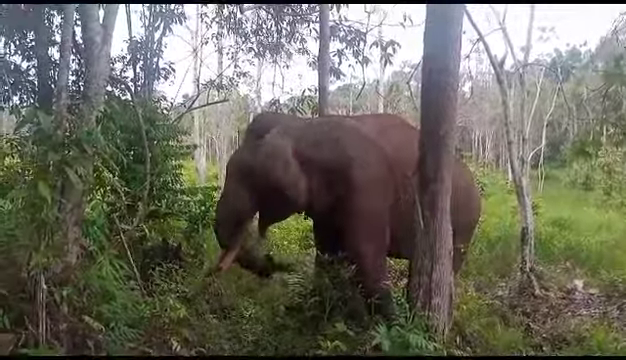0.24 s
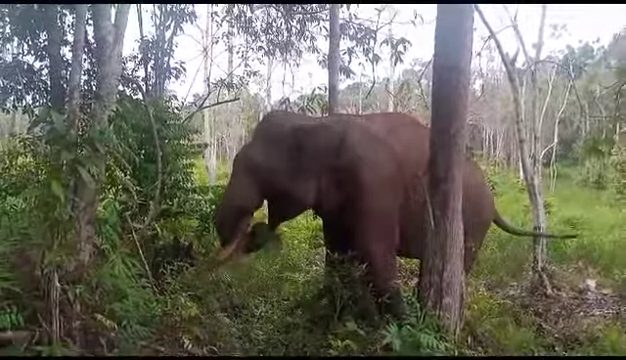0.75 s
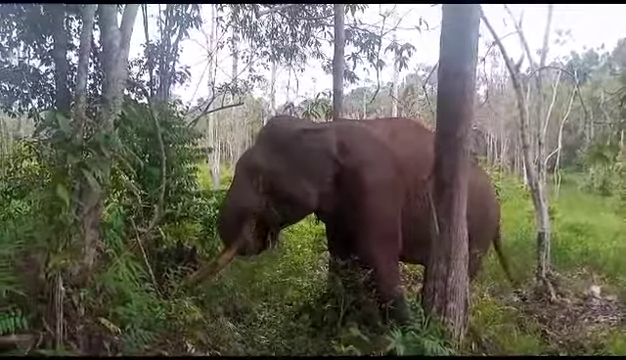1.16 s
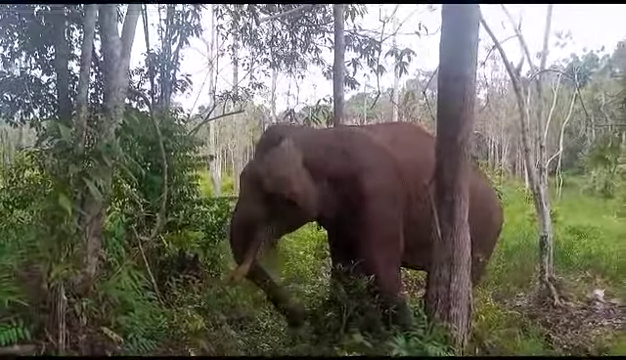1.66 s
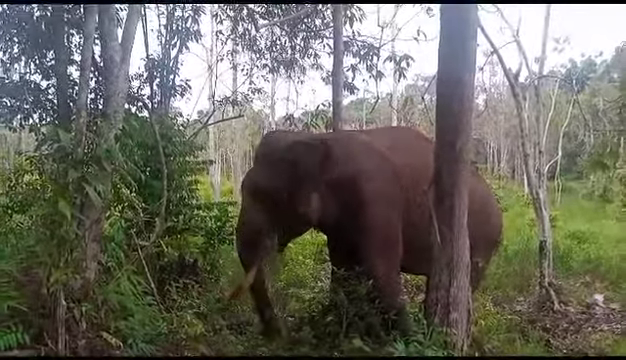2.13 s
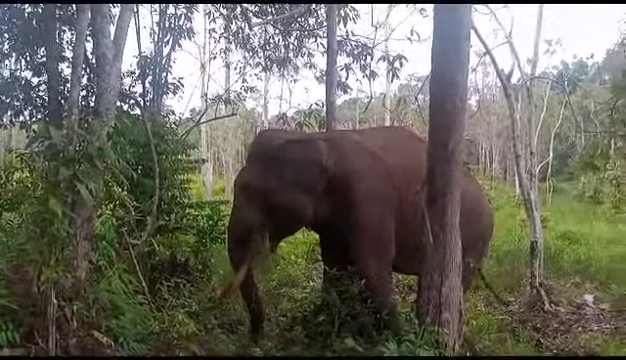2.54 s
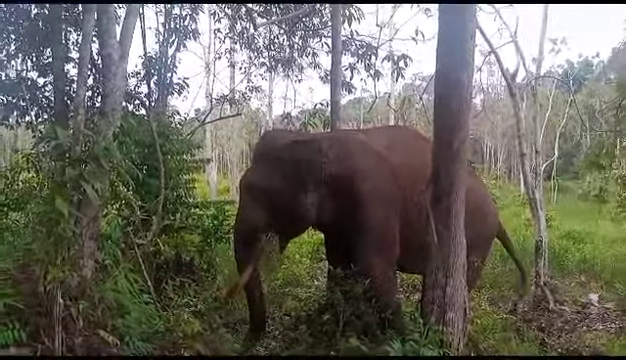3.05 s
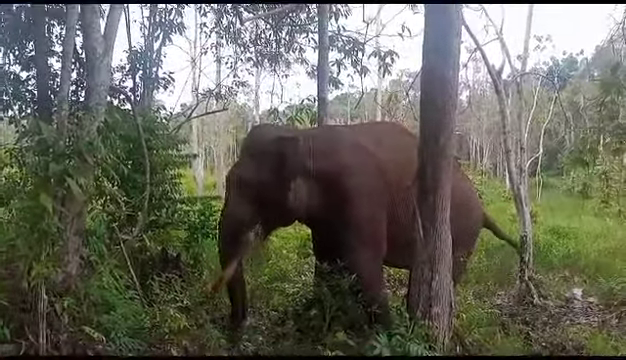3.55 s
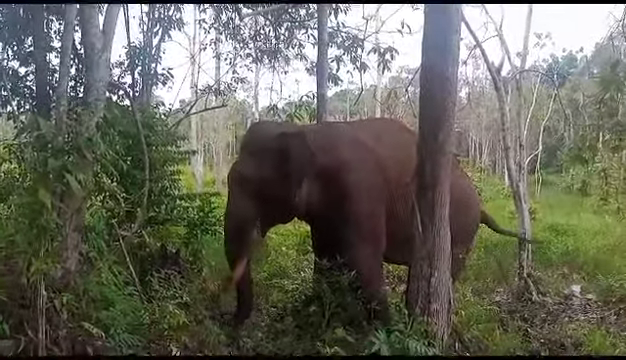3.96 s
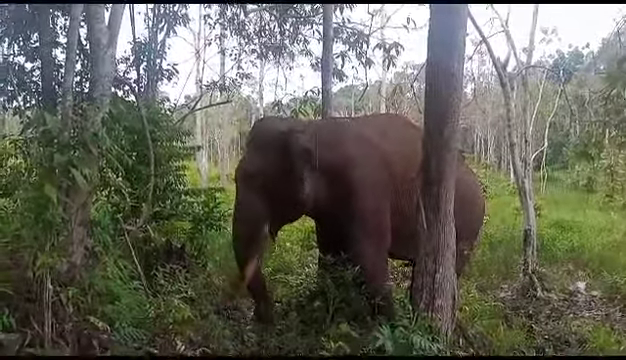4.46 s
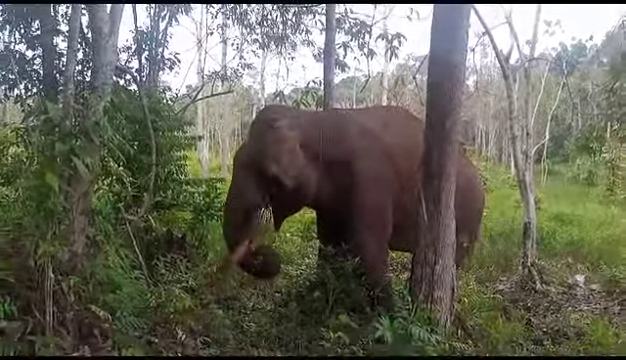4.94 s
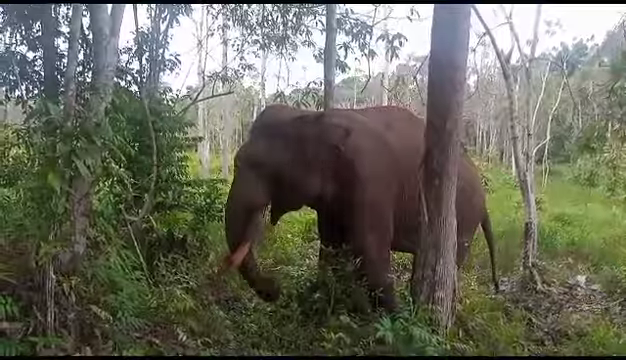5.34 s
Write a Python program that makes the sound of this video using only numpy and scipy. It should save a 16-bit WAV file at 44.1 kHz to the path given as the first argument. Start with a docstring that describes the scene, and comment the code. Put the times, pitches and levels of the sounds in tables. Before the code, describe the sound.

An elephant tears up grass and undergrowth with crackling rustles, sharp snaps and dull thumps, over a steady sizzle of forest insects.

```python
"""An elephant wraps its trunk round grass and undergrowth and tears it up at the edge of a forest.
Each tug sets leaves, stalks and roots crackling with tiny fractures; stems snap fibre by fibre,
sticks clack and the ground thumps dully. Insects buzz and shrill, a small bird whistles,
and the trees scatter a short echo."""
import sys
import numpy as np
from scipy import signal
from scipy.fft import rfft, irfft, next_fast_len
from scipy.io import wavfile
from scipy.ndimage import uniform_filter1d

SR = 44100
rng = np.random.default_rng(int(sys.argv[2]) if len(sys.argv) > 2 else 0)


def wrap_up_sound(samples):
    """Save the sound to the file named by the first command line argument, as 16-bit audio."""
    columns = np.atleast_2d(samples).T
    # keep every value between -1 and 1, then stretch to whole-number steps
    tamed = np.clip(columns, -1, 1)
    steps = np.round(tamed * 32767).astype(np.int16)
    wavfile.write(sys.argv[1], SR, steps)


N = 247004
T = np.arange(N) / SR

# tugs at the plants: (time [s], hold [s], leaves [dB], stalks [dB], roots [dB])
TRUNK_TUGS = [(0.0, 0.067, -55.5, -68, -67.5), (.098, .03, -44, -55.5, -56.5),
              (.25, 0.061, -58.5, -67, -74.5), (0.409, .04, -58, -72.5, -84), (.57, .09, -59.5, -73, -83.5),
              (.725, 0.096, -54.5, -65.5, -67.5), (.92, 0.011, -55, -66.5, -80),
              (1.016, 0.05, -53, -67.5, -67.5), (1.26, 0.042, -59, -75.5, -89),
              (1.346, 0.032, -52.5, -66.5, -74.5), (1.53, 0.017, -67.5, -82.5, -91),
              (1.895, .035, -61, -83, -87), (2.01, 0.065, -59.5, -76, -82.5), (2.21, 0.047, -63, -76, -89),
              (2.41, 0.035, -64.5, -74, -82), (2.573, 0.049, -60, -72, -83),
              (3.075, 0.12, -55.5, -69, -76.5), (3.23, 0.083, -59.5, -73.5, -76),
              (3.41, 0.045, -59, -76.5, -87), (3.488, 0.095, -62, -73, -82.5),
              (3.735, 0.044, -58.5, -70.5, -77), (3.9, 0.11, -59.5, -68, -70.5),
              (4.12, 0.18, -62, -70.5, -75.5), (4.387, .06, -48, -61.5, -68), (4.5, 0.079, -55, -66, -68),
              (4.595, 0.018, -49.5, -58.5, -66.5), (4.81, 0.063, -63.5, -68.5, -73),
              (4.99, 0.034, -64, -72, -74), (5.113, 0.06, -50, -62.5, -68),
              (5.26, 0.071, -63.5, -76.5, -79), (5.425, 0.03, -59, -74, -83),
              (5.5, 0.11, -63.5, -75, -73.5)]


def tearing():
    """Leaves, stalks and roots crackle; the harder the tug, the denser the fractures."""
    # spectra: (frequency [Hz], level [dB])
    leaf_spectrum = [(1700, -34), (2550, -9), (3300, -1.5), (4000, -2), (5200, -2), (6600, 0.5), (8000, -9),
                     (9600, -3), (11500, -7.5), (13500, -15.5), (16000, -9.5)]
    stalk_spectrum = [(700, -19), (1100, -8), (1450, 2), (1800, -2.5), (2100, 2), (2450, -15),
                      (3500, -27.5)]
    root_spectrum = [(25, -30), (70, -13), (130, -2.5), (260, -3), (440, 4.5), (600, -2), (850, 1.5),
                     (1200, -16), (2000, -18)]
    # light stirring between tugs: (time [s], leaves [dB], stalks [dB])
    stirring = [(0, -64.5, -74.5), (.95, -59.5, -74.5), (1.2, -65, -81.5), (1.6, -78, -81),
                (1.83, -73, -86), (2.15, -64, -82.5), (2.55, -66.5, -87.5), (2.83, -79, -85),
                (2.99, -60.5, -81.5), (3.35, -65, -79), (3.68, -66.5, -82), (3.901, -65, -76),
                (4.6, -63, -78), (4.9, -66, -80), (5.15, -64.5, -81.5), (5.6, -69.5, -75.5)]
    stir_s, stir_leaf_db, stir_stalk_db = np.transpose(stirring)
    _, _, tug_leaf_db, tug_stalk_db, tug_root_db = np.transpose(TRUNK_TUGS)
    leaf_db = strain(tug_leaf_db, np.interp(T, stir_s, stir_leaf_db), settle_db_per_s=126)
    stalk_db = strain(tug_stalk_db, np.interp(T, stir_s, stir_stalk_db), settle_db_per_s=262)
    root_db = strain(tug_root_db, stir_db=-86.5, settle_db_per_s=262)
    density = undb(0.5 * (leaf_db - leaf_db.mean()))
    slip_db = 1.37 * walk(130)
    leaves = ring(crackle(3500 * density, spread_db=2.2), response(leaf_spectrum)) * undb(leaf_db)
    stalks = ring(crackle(1100 * density, spread_db=2.2), response(stalk_spectrum)) * undb(stalk_db)
    roots = ring(crackle(600 * density, spread_db=1.73), response(root_spectrum)) * undb(root_db)
    plant = leaves + shifting_bands(stalks + roots, depth_db=5.5, rate_hz=24)
    return trees(plant * undb(slip_db), wet_db=-7.5, t60_s=0.052)


def strain(peaks_db, stir_db, settle_db_per_s, build_db_per_s=288):
    """Level [dB] of one plant part: each tug builds, holds and settles back to a light stirring."""
    t = T[::64, None]
    start_s, hold_s = np.transpose(TRUNK_TUGS)[:2]
    below_db = np.maximum(build_db_per_s * (start_s - t), settle_db_per_s * (t - start_s - hold_s))
    tug_db = np.interp(T, t[:, 0], np.max(peaks_db - below_db.clip(0), axis=1))
    return np.maximum(tug_db, stir_db + 2.2 * walk(14))


def crackle(rate_hz, spread_db):
    """Tiny fractures at random moments, many weak and a few strong."""
    strength = undb(spread_db * np.minimum(rng.exponential(size=N), 4.5))
    chance = np.clip(rate_hz / SR, 0, 1)
    breaks = rng.random(N) < chance
    return unit(breaks * strength * rng.choice([-1, 1], N) / np.sqrt(chance))


def shifting_bands(x, depth_db, rate_hz, count=17):
    """Narrow bands of the low and middle crackle swell and fade at random: a hollow, shifting rustle."""
    size = next_fast_len(N)
    hz, spectrum = np.fft.rfftfreq(size, 1 / SR), rfft(x, size)
    centres_hz = np.geomspace(280, 2500, count)
    bands = (irfft(spectrum * np.interp(hz, centres_hz, share), size)[:N] for share in np.eye(count))
    return sum(band * undb(depth_db * np.tanh(walk(rate_hz))) for band in bands)


def snaps():
    """A stem breaks as a quick volley of fibres giving way, each a tiny click."""
    # stem breaks: (time [s], level [dB], length [s], treble tilt [dB/octave])
    stem_breaks = [(0.0598, -26, 0.0025, -5), (.0630, -18.5, 0.0018, 0.5), (0.081, -22.5, 0.0034, 3.5),
                   (.0840, -24.5, 0.006, 5.5), (0.102, -27, 0.0051, 10), (0.111, -31, 0.0014, -3),
                   (0.1155, -27.5, 0.0049, 2), (0.1305, -29.5, 0.0047, 1), (0.245, -39, 0.0096, 8),
                   (0.7204, -52, 0.011, 6), (0.769, -40, .007, 0), (0.926, -42, 0.0023, 3),
                   (1.667, -46.5, 0.0027, 4), (2.6, -43, 0.0044, -6.5), (2.885, -50.5, 0.0054, 2),
                   (3.1835, -39, 0.0047, 1), (3.236, -45.5, 0.0029, -6.5), (3.7774, -45.5, 0.0029, -6.5),
                   (3.873, -52, .002, -4), (3.9903, -43.5, .003, -5), (4.002, -46, 0.0054, -9.5),
                   (4.1635, -30.5, 0.0025, 2.5), (4.363, -38.5, .006, -5.5), (4.4404, -35.5, 0.0039, -6),
                   (4.5982, -35.5, 0.0071, 1.5), (5.113, -43, 0.0046, -6.5)]
    # one fibre's click: (frequency [Hz], level [dB])
    fibre_spectrum = [(60, -54), (400, -17), (1000, -20), (1900, -6), (2600, -11), (3900, 6.5), (5000, 2.5),
                      (7000, 3.5), (10000, 2.5), (13000, -7), (16000, -8.5)]
    out = np.zeros(N)
    fibres = crackle(9000, spread_db=5.7)
    for start_s, db, length_s, tilt in stem_breaks:
        i = int(start_s * SR)
        volley = unit(fibres[i:i + max(int(length_s * SR), 20)])
        add(out, start_s, undb(db) * signal.fftconvolve(volley, response(fibre_spectrum, tilt)))
    return trees(out * undb(-7.5), wet_db=-3, t60_s=0.36)


def knocks():
    """Dull ground thumps, and sticks whose size decides which of their modes speaks."""
    # ground thumps: (time [s], level [dB], lowest mode [Hz])
    thumps = [(.005, -55, 88), (0.113, -45, 123), (.125, -42.5, 117), (.665, -56, 75), (0.685, -60.5, 134),
              (1.056, -56, 333), (1.093, -48, 333), (1.1, -32.5, 225), (1.38, -57, 150),
              (3.734, -64.5, 109), (4.456, -55, 125), (4.491, -58, 99), (4.596, -35, 111), (4.606, -41, 85)]
    # modes of a thump: (ratio to lowest mode, level [dB], t60 [s])
    thump_modes = [(1, 5.5, 0.092), (1.3, -3, 0.071), (1.6, -12, 0.027), (1.9, -6, 0.046),
                   (3.3, -9.5, 0.073), (4.0, -40, 0.031), (5.2, -20, 0.034), (7.85, -12, .04)]
    # sticks colliding: (time [s], level [dB], pitch [Hz], mode fall-off around it [dB/octave])
    clacks = [(.1265, -37, 870, 34), (0.272, -42.5, 990, 9), (0.7538, -44.5, 570, 9), (3.235, -62, 433, 22),
              (3.465, -65, 1240, 36), (3.845, -58.5, 430, 43), (3.926, -54.5, 525, 30),
              (4.18, -54.5, 448, 10), (4.596, -40.5, 524, 5.5), (4.7878, -43.5, 785, 20),
              (5.022, -61, 446, 26), (5.357, -52, 1220, 46), (5.584, -56.5, 427, 35)]
    # modes of a stick: (frequency [Hz], level [dB], t60 [s])
    stick_modes = [(429, 3.5, 0.099), (528, 5, 0.044), (664, -3.5, 0.067), (825, 7.5, 0.0086),
                   (990, 4.5, 0.026), (1150, 4, 0.063), (1800, 15, 0.022)]
    out = np.zeros(N)
    for start_s, level_db, lowest_hz in thumps:
        modes = [(lowest_hz * ratio, db, t60_s) for ratio, db, t60_s in thump_modes]
        add(out, start_s, undb(level_db - 2) * blow(modes, scuff_gain=0.024, scuff_s=0.015))
    for start_s, level_db, pitch_hz, slope in clacks:
        modes = [(hz, db - slope * abs(np.log2(hz / pitch_hz)), t60_s) for hz, db, t60_s in stick_modes]
        add(out, start_s, undb(level_db) * blow(modes, scuff_gain=0.085, scuff_s=0.0073))
    return trees(out, wet_db=-18, t60_s=0.23)


def blow(modes, scuff_gain, scuff_s):
    """Modes struck by one push and a short scuff; little radiates below the lowest. Peak 1."""
    t = T[:SR // 3]
    body = sum(undb(db - 60 * t / t60_s) * np.sin(2 * np.pi * hz * t) for hz, db, t60_s in modes)
    push = scuff_gain * rng.standard_normal(len(t)) * np.exp(-t / scuff_s)
    push[0] += 1
    highpass = signal.butter(3, 0.92 * modes[0][0], "high", fs=SR, output="sos")
    radiated = signal.sosfilt(highpass, signal.fftconvolve(push, body)[:len(t)])
    return radiated / np.abs(radiated).max()


def buzzing_insects():
    """Thin gliding buzzes, pulsed by the strokes that make them."""
    # calls: (time [s], length [s], start [Hz], end [Hz], level [dB], overtone gain [dB])
    buzzes = [(0.254, 1.1, 2912, 2984, -75.5, 3), (0.999, 2.67, 3020, 2997, -76.5, 2),
              (1.251, .4, 2925, 2940, -69.5, -4), (1.6, 0.72, 2940, 2974, -73, 0.5),
              (1.351, 0.432, 3012, 3030, -66.5, -6.5), (1.9, 1.25, 3030, 3092, -74, -1.5),
              (3.395, 1.1, 2992, 2960, -81, -2), (4.099, 1.5, 2976, 2954, -73, -2),
              (5.252, 0.57, 3080, 3040, -74, 2)]
    # overtones: (harmonic number, level [dB])
    harmonics = [(2, -2.5), (3, 3.5), (4, 1.5)]
    out = np.zeros(N)
    for start_s, length_s, start_hz, end_hz, level_db, overtone_db in buzzes:
        hz, swell = insect_call(length_s, start_hz, end_hz, fade_s=0.089)
        n = len(hz)
        phase = phase_of(hz * (1 + 0.00085 * walk(300, n)))
        stroke_hz = 73 * (1 + 0.03 * walk(22, n))
        strokes = 1 + 0.5 * np.sin(phase_of(stroke_hz))
        overtones = sum(undb(db + 2.8 * walk(40, n)) * np.sin(k * phase) for k, db in harmonics)
        tone = np.sin(phase) + undb(overtone_db) * overtones
        add(out, start_s, undb(level_db) * swell * strokes * tone)
    return out


def shrill_insect():
    """A high tone, fluttering in level and pitch."""
    # calls: (time [s], length [s], start [Hz], end [Hz], level [dB])
    shrills = [(0.08, .9, 6000, 6100, -58.5), (2.45, 1.65, 6195, 6055, -63.5), (4.05, 1.8, 6085, 6180, -62)]
    out = np.zeros(N)
    for start_s, length_s, start_hz, end_hz, db in shrills:
        hz, swell = insect_call(length_s, start_hz, end_hz, fade_s=0.32)
        n = len(hz)
        flutter = 1 + 0.4 * walk(70, n)
        waver = 1 + 0.00205 * walk(40.14, n) + 0.0032 * walk(500, n)
        surge_db = 1.5 * walk(11.6, n)
        add(out, start_s, undb(db + surge_db) * swell * flutter * np.sin(phase_of(hz * waver)))
    return out


def insect_call(length_s, start_hz, end_hz, fade_s):
    """Pitch [Hz] and envelope of a call that swells, holds and fades while gliding evenly."""
    t = T[:int(length_s * SR)]
    swell = np.clip(np.minimum(t, length_s - t) / fade_s, 0, 1)
    return np.linspace(start_hz, end_hz, len(t)), swell


def bird():
    """Short falling whistles from far among the trees, hoarser the further they fall."""
    # notes: (time [s], length [s], start [Hz], end [Hz], level [dB])
    chirps = [(1.667, 0.0097, 4010, 3600, -61), (4.2, 0.012, 3900, 3770, -58),
              (4.65, 0.1, 4230, 3980, -55.5), (4.778, 0.097, 4360, 3686, -59.5),
              (4.934, 0.05, 4320, 4090, -61), (5.266, 0.057, 3600, 3550, -55.5)]
    out, rasp = np.zeros(N), walk(1500)
    for start_s, length_s, start_hz, end_hz, db in chirps:
        n, i = int(length_s * SR), int(start_s * SR)
        hz = np.linspace(start_hz, end_hz, n) + 0.5 * (start_hz - end_hz) * rasp[i:i + n]
        add(out, start_s, undb(db) * signal.windows.tukey(n, 0.5) * np.sin(phase_of(hz)))
    return trees(out, wet_db=-4, t60_s=1.0)


def forest():
    """Low air and the even sizzle of countless distant insects."""
    # air and chorus: (frequency [Hz], level [dB])
    forest_spectrum = [(25, -29), (70, -9.5), (160, -15), (330, -19.5), (900, -28.5), (2000, -25.5),
                       (4400, -21), (5400, -5.5), (6500, -8), (7300, -1.5), (9000, 1), (10400, -9.5),
                       (13000, -13), (16000, -19)]
    air = ring(rng.standard_normal(N), response(forest_spectrum))
    return air * undb(-60.5 + 0.38 * walk(2.4) + 0.5 * walk(60))


def trees(x, wet_db, t60_s):
    """Trunks and foliage scatter a short diffuse tail behind the direct sound."""
    t = T[:SR // 2]
    onset = 1 - np.exp(-t / 0.001)
    tail = rng.standard_normal(len(t)) * undb(-60 * t / t60_s) * onset
    return x + undb(wet_db) * ring(x, tail / np.linalg.norm(tail))


def response(points, tilt_db_per_octave=0, size=4096):
    """Minimum-phase, unit-energy impulse response from (frequency [Hz], level [dB]) points."""
    hz, db = np.transpose(points)
    octave = np.log2(np.maximum(np.fft.rfftfreq(size, 1 / SR), 1))
    tilt_db = tilt_db_per_octave * np.maximum(octave - 10, 0)  # above 1024 Hz
    cepstrum = irfft(np.log(undb(np.interp(octave, np.log2(hz), db) + tilt_db)))
    cepstrum[1:size // 2] *= 2
    cepstrum[size // 2 + 1:] = 0
    impulse = irfft(np.exp(rfft(cepstrum)))
    return impulse / np.linalg.norm(impulse)


def ring(x, impulse):
    """Convolve with an impulse response."""
    return signal.fftconvolve(x, impulse)[:N]


def walk(rate_hz, size=N):
    """Smooth random wander, rms 1."""
    hold = max(int(SR / rate_hz), 1)
    steps = np.repeat(rng.standard_normal(size // hold + 1), hold)
    return unit(uniform_filter1d(uniform_filter1d(steps, hold), hold)[:size])


def phase_of(hz):
    """Phase [rad] of a moving pitch."""
    return 2 * np.pi * np.cumsum(hz) / SR


def add(out, start_s, x):
    """Mix x into out."""
    i = max(int(start_s * SR), 0)
    out[i:i + len(x)] += x[:N - i]


def undb(db):
    """Decibels to gain."""
    return 10 ** (np.asarray(db) / 20)


def unit(x):
    """Scale to rms 1."""
    return x / np.sqrt(np.mean(x ** 2) + 1e-30)


def scene():
    """The feeding elephant in its forest, mono."""
    elephant = tearing() + snaps() + knocks()
    return (elephant + buzzing_insects() + shrill_insect() + bird() + forest())[None]


def record(dry):
    """A small microphone with a bright top resonance, then a steep low-pass."""
    # microphone response: (frequency [Hz], gain [dB])
    mic_curve = [(20, 0), (13900, 0), (14900, 11.5), (15700, 11.5)]
    impulse = response(mic_curve)
    bright = ring(dry[0], impulse / abs(impulse.sum()))
    cutoff_hz = 15750
    lowpass = signal.ellip(12, 0.2, 70, cutoff_hz, fs=SR, output="sos")
    return signal.sosfilt(lowpass, bright)[None]


dry = scene()
out = record(dry)
wrap_up_sound(out)
```